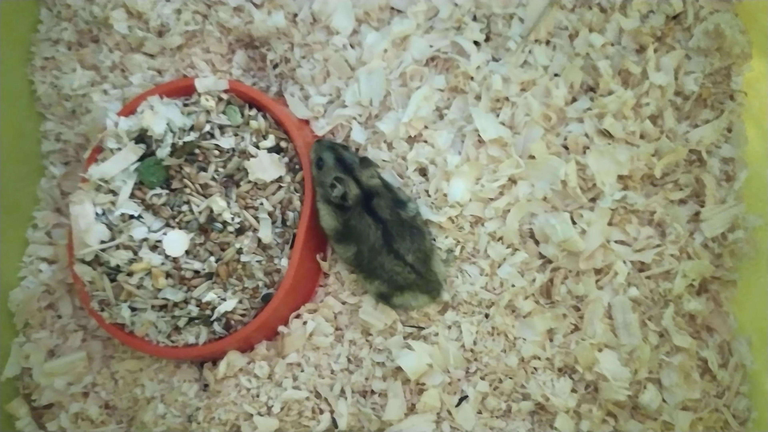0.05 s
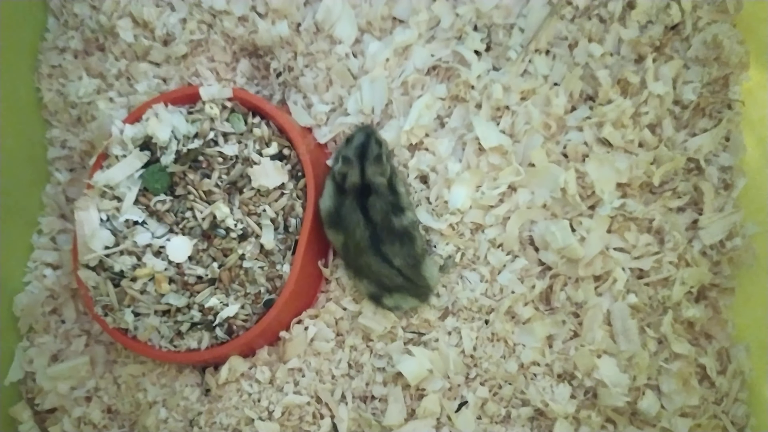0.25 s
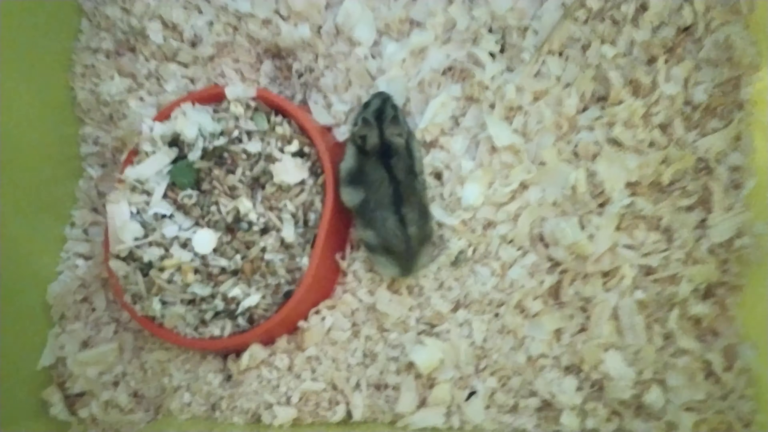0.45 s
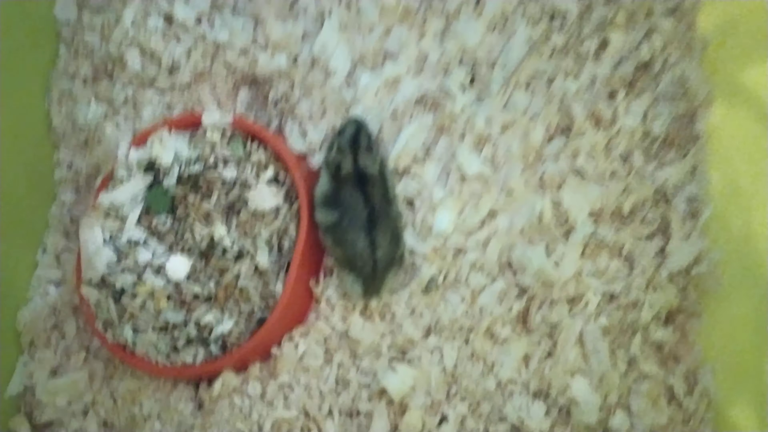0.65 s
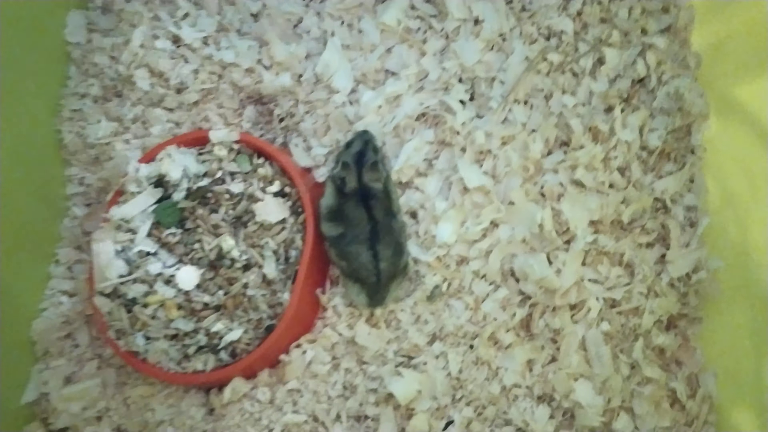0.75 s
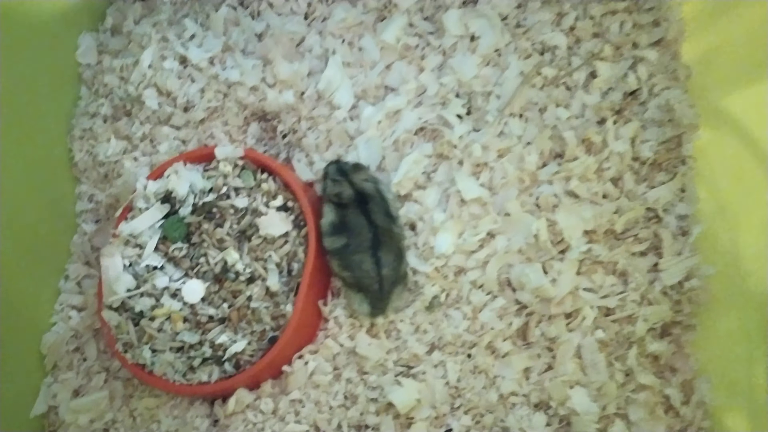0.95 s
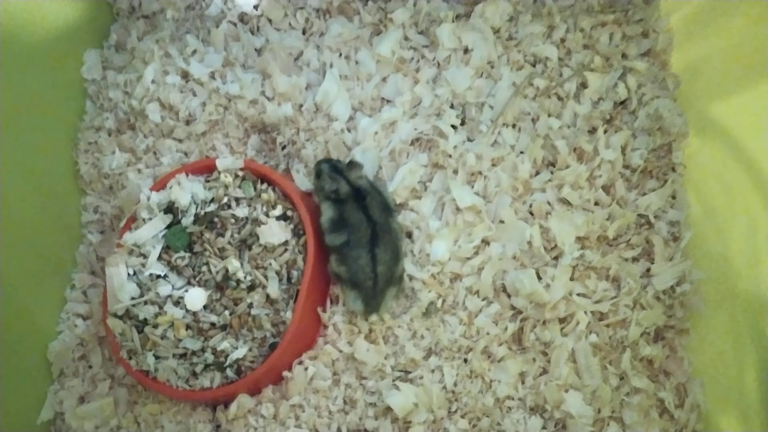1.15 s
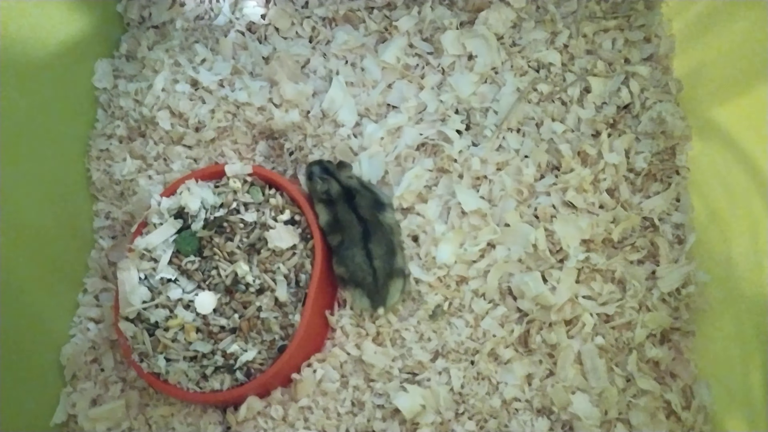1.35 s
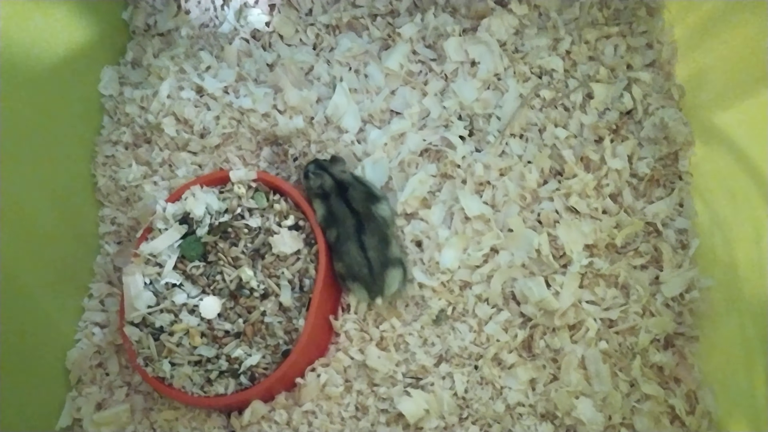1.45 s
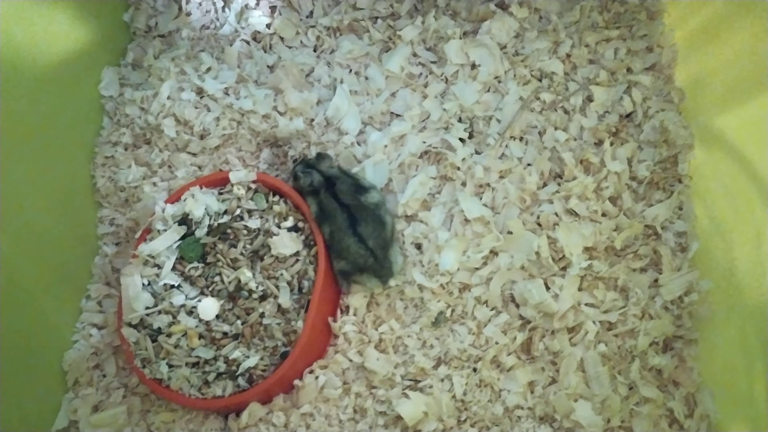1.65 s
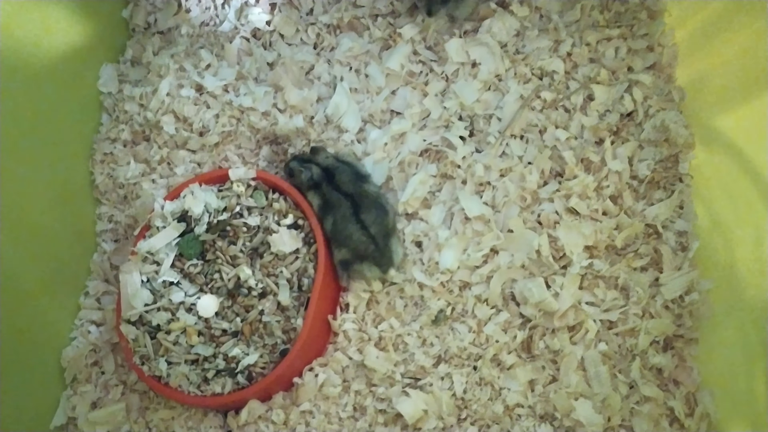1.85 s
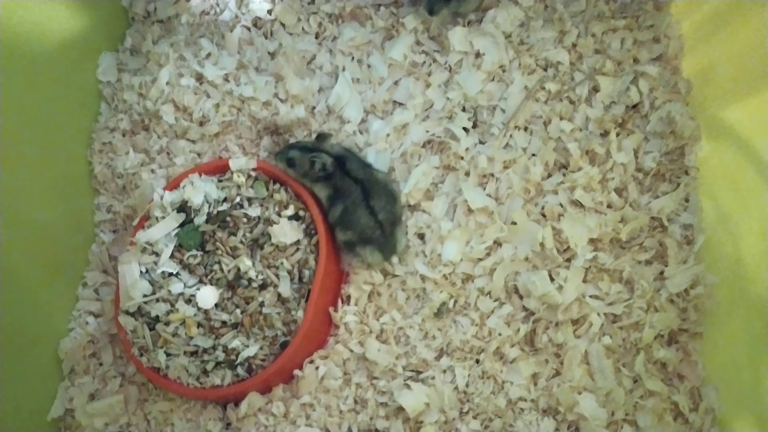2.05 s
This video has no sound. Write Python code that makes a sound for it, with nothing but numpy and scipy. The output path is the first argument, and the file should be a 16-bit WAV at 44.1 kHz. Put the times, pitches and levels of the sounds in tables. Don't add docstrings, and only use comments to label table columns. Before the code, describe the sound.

A hamster scurries through dry shavings in a plastic tub: quick dull paw thumps and fine crackle from 0 to 1.05 seconds. At 0.24 a very loud, sharp plastic click strikes the left microphone; scratchy finger rubs and falling ticks follow at 0.45-0.61, with a dull thud at 0.56. Busy steps and bright snaps peak around 0.9-1.0, then sparse, faint paws and rustle continue to about 2.1 over low hand rumble and quiet room hush.

```python
import sys
import numpy as np
from scipy import signal
from scipy.fft import rfft, irfft
from scipy.io import wavfile
from scipy.ndimage import uniform_filter1d

SR = 44100
rng = np.random.default_rng(int(sys.argv[2]) if len(sys.argv) > 2 else 0)


def dump(signal):
    limited = np.clip(np.atleast_2d(signal).T, -1, 1)
    pcm = np.round(limited * 32767).astype(np.int16)
    wavfile.write(sys.argv[1], SR, pcm)


def boost(x):
    u = np.asarray(x, float) / 20
    return 10 ** u


N = 92610
TIME = np.arange(N) / SR


def evened(x):
    return x / np.sqrt(np.mean(x ** 2) + 1e-20)


def curve(table, column):
    rows = np.array(table)
    return np.interp(TIME, rows[:, 0], rows[:, column])


def colour(x, points):
    f, level_db = np.transpose(points)
    hz = np.fft.rfftfreq(N, 1 / SR)
    gain = boost(np.interp(np.log(hz + 1), np.log(f), level_db))
    return irfft(rfft(x) * gain, N)


def add(mix, s, sound):
    part = mix[..., round(s * SR):][..., :sound.shape[-1]]
    part += sound[..., :part.shape[-1]]


def stereo(left_db, right_db):
    return boost(np.array([[left_db], [right_db]]))


def resonate(x, hz, width_hz):
    turn = np.exp(2j * np.pi * hz * np.arange(x.shape[-1]) / SR)
    r = np.exp(-np.pi * width_hz / SR)
    return 2 * (turn * signal.lfilter([1 - r], [1, -r], x / turn)).real


def resonate_twice(x, hz, width_hz, second_width_hz):
    return resonate(resonate(x, hz, width_hz), hz, second_width_hz)


def wander(rate_hz):
    rates = np.geomspace(3, rate_hz, num=30)
    return evened(sum(np.sin(2 * np.pi * (f * TIME + rng.random())) for f in rates))


def burst(peak_db, hz, width_hz, t60, rise_s=0.00016):
    t = np.arange(1200) / SR
    puff = evened(resonate_twice(rng.standard_normal(1200), hz, width_hz, width_hz))
    swell = np.minimum(t / rise_s, 1) ** 2
    return puff * .5 * swell * boost(peak_db - 60 * np.maximum(t - rise_s, 0) / t60)


# [t/s, peak level/dB]
FOOTFALLS = [(0.039, -43), (0.053, -26.5), (0.075, -42), (0.124, -36), (0.163, -34.5), (0.19, -32.5),
             (0.214, -30.5), (0.278, -27), (0.342, -35.5), (0.382, -40.5), (0.433, -34), (0.595, -24.5),
             (0.755, -26.5), (0.801, -35), (0.834, -38.5), (0.862, -32), (0.892, -26.5), (1.004, -24.5),
             (1.034, -39), (1.187, -48), (1.246, -47.5), (1.31, -41.5), (1.348, -41), (1.403, -46.5),
             (1.522, -46), (1.58, -50.5), (1.66, -44)]
# [t/s, peak level/dB]
MORE_FOOTFALLS = [
    (0.004, -60),
    (0.919, -44),
    (1.698, -56),
    (1.829, -50.5),
    (1.939, -41),
    (2.002, -44.5),
    (2.068, -54),
]


def footfall_envelope():
    rise_s, t60_s, knock_t60_s = 0.0043, 0.13, 0.0077
    t, out = np.arange(0, .2, 1 / SR), np.zeros(N)
    press = np.minimum(t / rise_s, 1) * boost(-60 * t / t60_s)
    knock = boost(-2.5 - 60 * t / knock_t60_s)
    for s, peak_db in [*FOOTFALLS, *MORE_FOOTFALLS]:
        add(out, max(s - rise_s, 0), (press + knock) * boost(peak_db - 5))
    return out


def paw_blows():
    out = np.zeros(N)
    for s, peak_db in [*FOOTFALLS, *MORE_FOOTFALLS]:
        add(out, s, boost(np.array([peak_db + 12.5])))
    return out


# [f/Hz, width/Hz, level/dB]
FLOOR_MODES = [(258.4, 62.4, 6), (414, 223, -4.5), (536.5, 87.7, 0.5), (972, 502, -14.5),
               (1333, 736, -19.5), (2665, 260, -48)]
# [t/s, tub rumble level/dB, shavings level/dB]
STIR = [(0, -52.5, -51.5), (.1, -52, -55), (.2, -50, -53), (.3, -65, -54.5), (.4, -55, -56),
        (.45, -51, -50), (.53, -46, -73), (.66, -56, -68.5), (.75, -48, -62.5), (.85, -51.5, -57.5),
        (.92, -40, -50.5), (.98, -58, -51.5), (1.05, -52, -57), (1.15, -64.5, -59.5), (1.45, -67, -59.5),
        (1.62, -77, -55.5), (1.72, -78, -62), (2.1, -63.5, -58)]


def floor_ring(x):
    return sum((-1) ** k * boost(db) * resonate(x, hz, width_hz)
               for k, (hz, width_hz, db) in enumerate(FLOOR_MODES))


def tub(steps):
    same = 0.39
    a, b = rng.standard_normal((2, N))
    drive = np.array([a, same * a + np.sqrt(1 - same ** 2) * b])
    shake = np.hypot(steps, boost(curve(STIR, 1) + 0.92 * wander(35)))
    ring = floor_ring(drive * shake + paw_blows()) / np.sqrt(np.mean(floor_ring(a) ** 2))
    return colour(ring, [(90, -13.5), (220, -2), (3000, 2), (5000, -8.5)]) * stereo(2, -2.5)


# [start t/s, length/s, level/dB, f/Hz]
ROCKS = [
    (.08, 0.12, -45, 139.2),
    (.62, 0.077, -56.5, 160),
    (.715, .11, -39.5, 134.2),
    (.86, 0.1, -46.5, 165.7),
    (1.02, 0.054, -42.5, 168),
]


def rocking():
    out = np.zeros(N)
    for s, length, level_db, hz in ROCKS:
        t = np.arange(0, length, 1 / SR)
        sway = np.sin(2 * np.pi * hz * t) + 0.61 * np.sin(2 * np.pi * (1.2 * hz * t + rng.random()))
        add(out, s, sway * np.sin(np.pi * t / length) * boost(level_db))
    return out * stereo(2, -1)


# [f/Hz, level/dB]
LEFT_PORT = [(2500, -28.5), (4500, -9), (5500, -8), (7300, -1), (9000, -4.5), (11500, -13.5), (15000, -9.5),
             (16400, -32)]
RIGHT_PORT = [(2500, -8.5), (5000, -15.5), (6600, -26.5), (8000, -18), (9300, -4.5), (11500, -20),
              (15000, -26.5), (16400, -20.5)]
# [t/s, peak level/dB, f/Hz, left over right/dB]
SNAPS = [(0.0558, -41.5, 8050, 9), (0.1311, -40, 9000, 9), (0.179, -39.5, 8400, 12),
         (0.2738, -39.5, 8100, 9.5), (0.4179, -43, 12600, 6), (0.4324, -37, 12700, 9),
         (0.4404, -48, 9360, 3), (0.7058, -46.5, 10200, 23), (0.7522, -44, 7740, 11),
         (0.7736, -48, 9600, 12), (0.7941, -44.5, 7700, 18), (0.8245, -45, 8500, 24),
         (0.8644, -39.5, 8180, 17), (0.8874, -42.5, 7800, 7), (0.9043, -34, 7500, 14),
         (0.9283, -43, 8200, 9.0), (1.0016, -35, 7740, 16), (1.1697, -51.5, 9000, 12.5),
         (1.6227, -50, 7800, 10), (2.0772, -42, 12500, 4), (2.0778, -43, 8000, 4)]


def shavings(steps):
    grains_per_s, spread_db, grain_t60_s = 700, 5, 0.0035
    size = boost(spread_db * np.minimum(rng.exponential(1, N), 2.5))
    hits = size * (rng.random(N) < grains_per_s / SR)
    grains = signal.oaconvolve(hits, boost(-60 * np.arange(300) / SR / grain_t60_s))[:N]
    level = np.hypot(boost(curve(STIR, 2) + 1.5 * wander(60)), boost(-27.5) * steps)
    noise = rng.standard_normal((2, N)) * np.hypot(1, boost(-3) * evened(grains)) * level
    left = colour(noise[0], [(900, -34.5), *LEFT_PORT])
    right = colour(noise[1], [(900, -41), *RIGHT_PORT])
    out = np.array([left, right]) * boost(4.5)
    for s, peak_db, hz, pan_db in SNAPS:
        snap = [burst(peak_db + 3.5 - side_db, hz, 2500, 0.019) for side_db in (0, pan_db)]
        add(out, s, np.array(snap))
    return out


# [t/s, peak level/dB, f/Hz, left over right/dB]
CHIPS = [
    (1.4909, -58, 3260, 2.5),
    (1.5957, -53, 4500, 3),
    (1.9878, -54, 3500, 1.5),
    (2.0778, -49, 4200, 2.5),
    (2.0773, -47, 13000, 4),
    (.9055, -39, 7500, 12),
    (.9055, -43, 6200, 12),
]


def chips():
    rise_s, t60_s = .0008, .016
    t, out = np.arange(0, .03, 1 / SR), np.zeros((2, N))
    for s, peak_db, hz, pan_db in CHIPS:
        ring = np.sin(2 * np.pi * hz * t) * np.minimum(t / rise_s, 1) * boost(peak_db - 60 * t / t60_s)
        add(out, s, ring * stereo(pan_db / 2, -pan_db / 2))
    return out


def tick(peak_db, start_hz, end_hz, t60):
    t = np.arange(0, .08, 1 / SR)
    glide_hz = end_hz + (start_hz - end_hz) * np.exp(-t * end_hz / .51)
    turns = np.cumsum(glide_hz) / SR
    rise = np.clip(np.minimum(turns * 4 / 3, t / .0009), 0, 1)
    return -np.sin(2 * np.pi * turns) * rise * boost(peak_db - 60 * t / t60)


# [t/s, peak level/dB, start f/Hz, end f/Hz, t60/s]
FLICKS = [
    (.24063, -.3, 2583, 868, .015),
    (.24207, 2, 602, 168, .0146),
    (.24594, -19, 421, 137, .07),
    (.2402, -2, 5210, 2265, .004),
    (.24233, -5.2, 540, 761, .0129),
    (.5585, -12, 456, 145, .012),
    (.5585, -23, 456, 145, .1),
]


def flicks(out):
    for s, *wave in FLICKS:
        add(out[0], s, tick(*wave))


# [t/s, peak level/dB, start f/Hz, end f/Hz, t60/s]
TICKS = [
    (0.4548, -25, 2440, 1630, 0.004),
    (0.4655, -17, 4200, 850, 0.014),
    (0.5088, -18, 3800, 605, 0.017),
    (.5105, -21, 514, 290, .02),
    (0.222, -39, 3500, 2000, .005),
    (.5568, -23, 6500, 1400, 0.005),
    (.5325, -29, 3000, 1000, .008),
    (.5215, -33, 5000, 1500, .004),
    (.606, -32, 3500, 1200, .006),
]


def ticks(out):
    for s, *row in TICKS:
        wave = tick(*row)
        add(out, s, np.array([wave, boost(-14) * resonate(wave, 3300, 1700)]))


# [t/s, peak level/dB, f/Hz]
CRACKS = [(.2205, -28, 8000), (.2406, -22, 7500), (.241, -17, 4300), (.455, -13.5, 11000),
          (.4654, -20, 8000), (.482, -30, 9000), (.486, -31, 9500), (.497, -36, 8500), (.509, -17.5, 9500),
          (.5152, -37, 10000), (.5215, -31, 9000), (.5325, -38, 9500), (.545, -39, 9000),
          (.5573, -26, 9000), (.5945, -31, 11000), (.5975, -27, 10500), (.606, -34, 10000)]


def cracks(out):
    rise_s = .001
    for s, peak_db, hz in CRACKS:
        add(out, s - rise_s, burst(peak_db, hz, 3400, .0035, rise_s) * stereo(0, -24))


# [start t/s, length/s, level/dB, squeak f/Hz]
RUBS = [
    (0.435, 0.035, -52, 11600),
    (0.476, 0.023, -41, 9000),
    (0.505, 0.0057, -42, 9200),
    (0.547, 0.013, -45, 9900),
    (0.586, 0.021, -47.5, 10700),
]


def rubs(out):
    slips_per_s, low_hz = 2600, 900
    for s, length, level_db, squeak_hz in RUBS:
        n = round(length * SR)
        size = boost(4 * np.minimum(rng.exponential(1, 2500), 2))
        slips = size * (rng.random(2500) < slips_per_s / SR)
        friction = signal.lfilter([1], [1, -.95], slips + 0.027)
        grit = evened(rng.standard_normal(2500) * friction)[:n] * np.hanning(n) ** .5
        high = 2 * resonate_twice(grit, squeak_hz, 2700, 2700)
        low = boost(-8) * 4 * resonate_twice(grit, low_hz, 3700, 3200)
        right = boost(-49) * high + boost(-22) * resonate(low, 3500, 1600)
        add(out, s, boost(level_db) * np.array([high + low, right]))


# [f/Hz, level/dB]
SHELL_PATH = [(4500, 0), (5700, -4), (7000, 0), (12500, 0), (15000, -16)]


def shell():
    out = np.zeros((2, N))
    flicks(out)
    ticks(out)
    cracks(out)
    rubs(out)
    return colour(out, SHELL_PATH)


# [t/s, level/dB]
HAND = [
    (0, -47),
    (.25, -45),
    (.55, -50.5),
    (.7, -50),
    (1.0, -51),
    (1.15, -63),
    (2.1, -69.5),
]


def hand_rumble():
    a, b = rng.standard_normal((2, N))
    spectrum = [(20, 1.5), (45, 3.5), (90, 2), (200, 6.5), (400, -44.5)]
    rumble = np.array([evened(colour(x, spectrum)) for x in (a, 0.87 * a + 0.57 * b)])
    return rumble * boost(curve(HAND, 1) + 1.8 * wander(19) + np.array([[0], [-3]]))


# [f/Hz, level/dB per Hz]
HUSH_LEFT = [(25, -88), (50, -67.5), (85, -99), (300, -93), (800, -102), (1800, -107), (2600, -105),
             (4000, -112)]
HUSH_RIGHT = [(25, -91.5), (50, -76), (85, -100), (300, -99.5), (800, -103), (1900, -108), (2650, -101),
              (4000, -112)]


def hush():
    a, b = rng.standard_normal((2, N))
    left = colour(a, [*HUSH_LEFT, (6000, -125)])
    right = colour(0.15 * a + b, [*HUSH_RIGHT, (6000, -125)])
    return np.sqrt(SR / 2) * np.array([left, right])


def scene():
    duck_from_db, duck_share, recovery_db_per_s = -32, .25, 600
    steps, near = footfall_envelope(), shell()
    power_db = 10 * np.log10(abs(uniform_filter1d(near ** 2, size=60, axis=1)) + 1e-12)
    fall = TIME * recovery_db_per_s
    held_db = np.maximum.accumulate(power_db + fall, axis=1) - fall
    over_db = np.maximum(held_db - duck_from_db, 0)
    far = tub(steps) + rocking() + shavings(steps) + chips() + hand_rumble() + hush()
    return far * boost(-duck_share * over_db) + near


def top_cut(x):
    return signal.sosfilt(signal.butter(12, 16390, fs=SR, output="sos"), x)


def record(dry):
    edge = signal.firwin(511, 16100, window=("kaiser", 9), fs=SR)
    mix = signal.oaconvolve(dry, edge[None], "same")
    return top_cut(mix)


dry = scene()
out = record(dry)
dump(out)
```